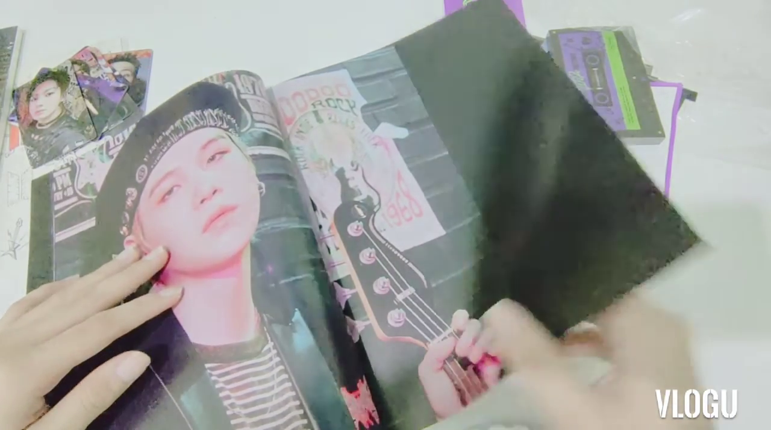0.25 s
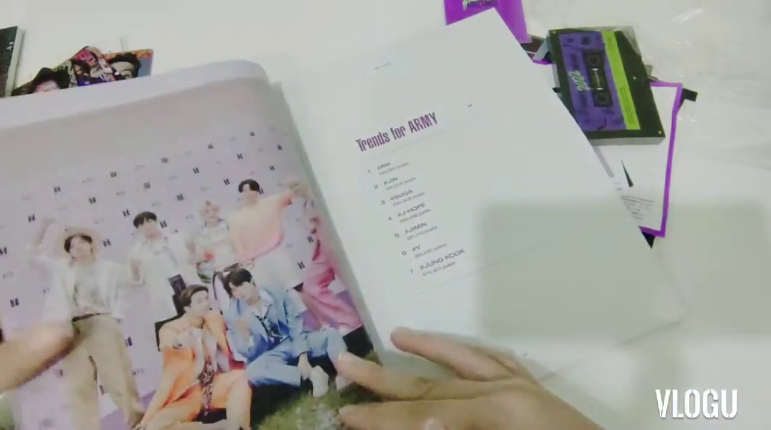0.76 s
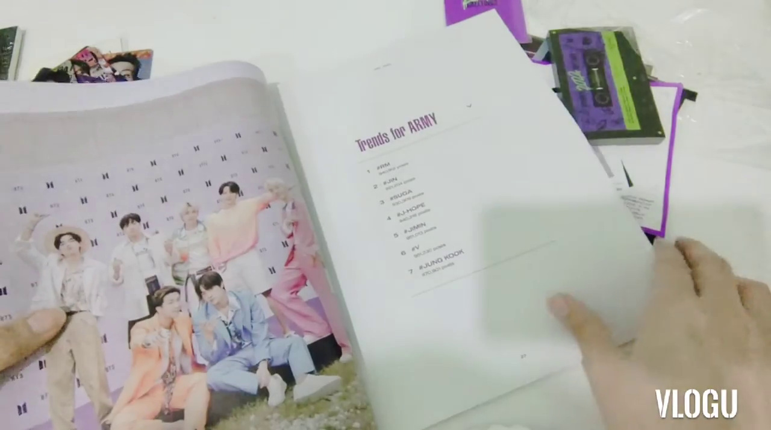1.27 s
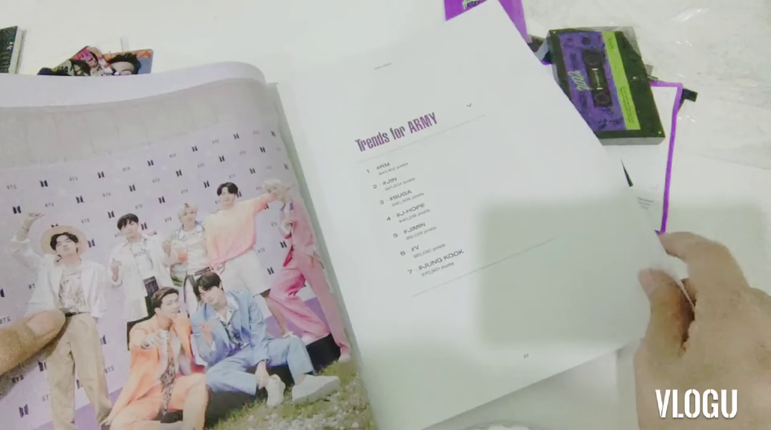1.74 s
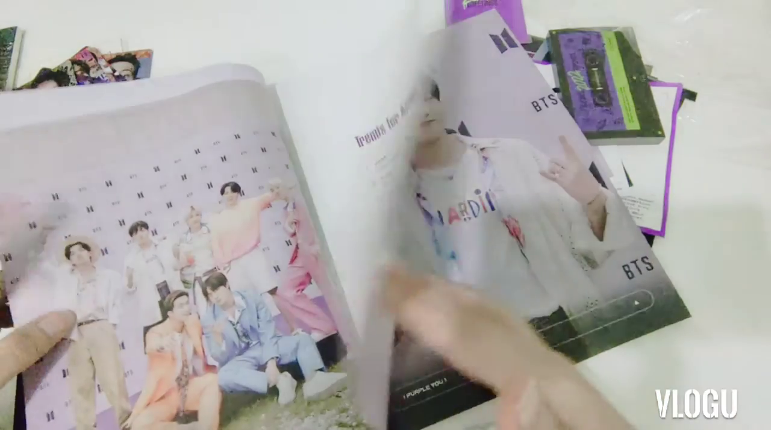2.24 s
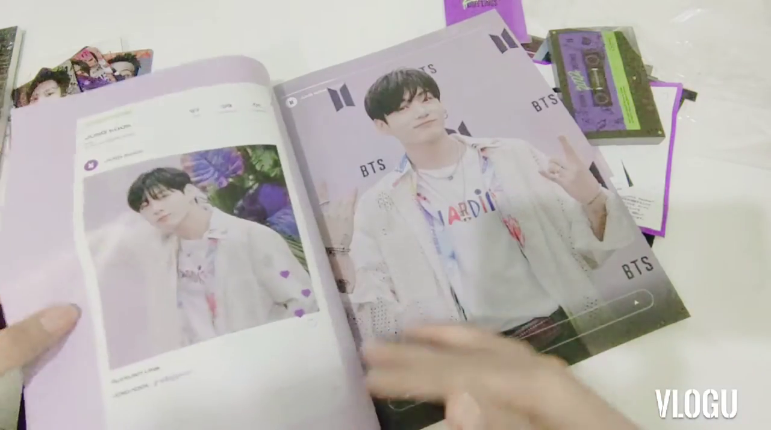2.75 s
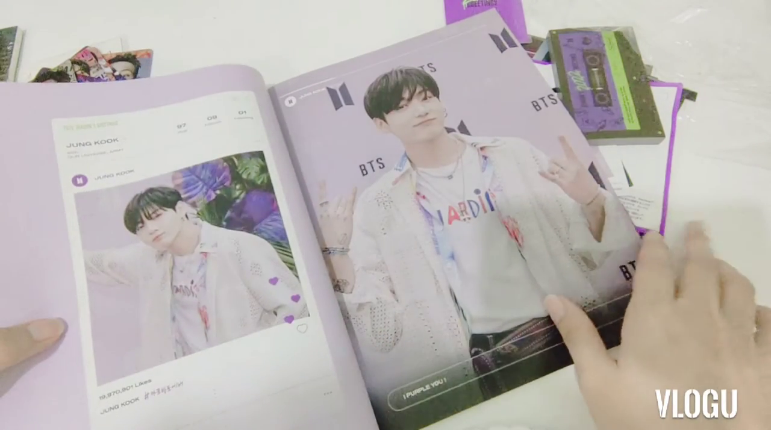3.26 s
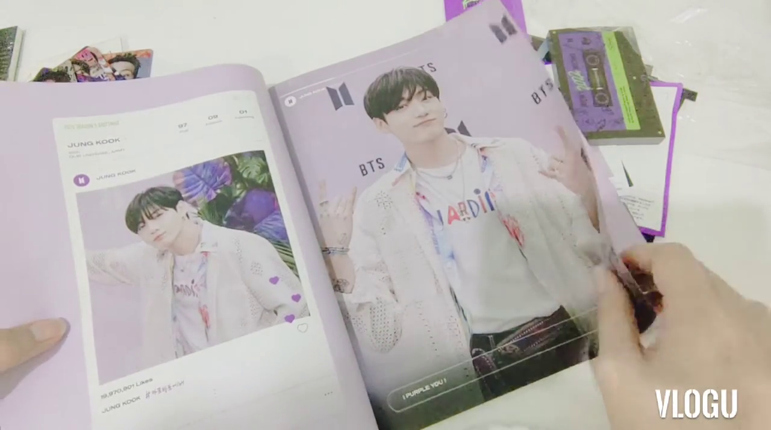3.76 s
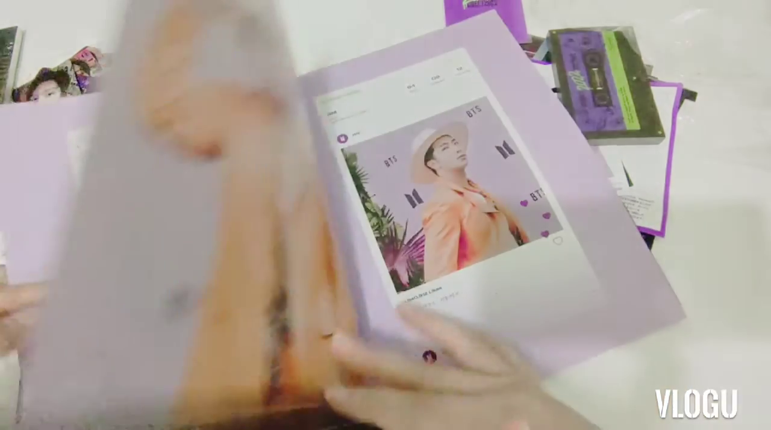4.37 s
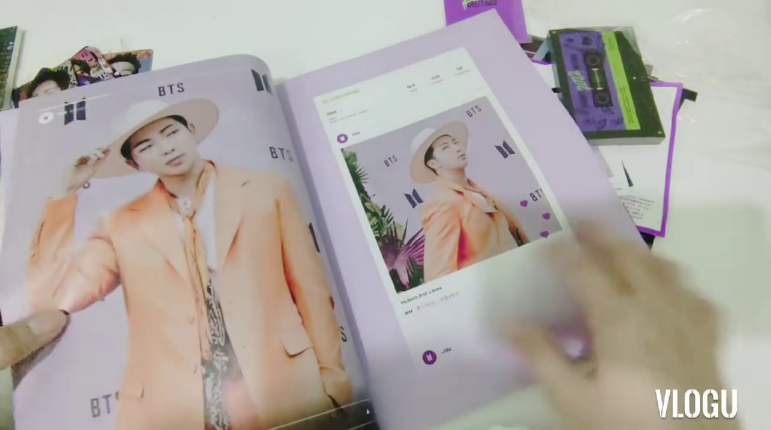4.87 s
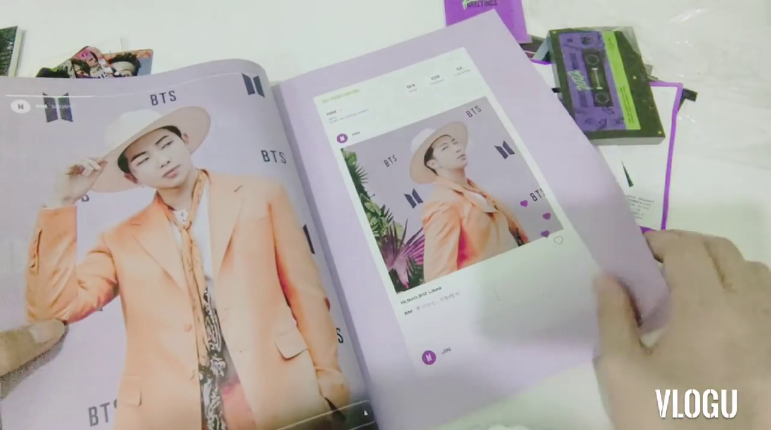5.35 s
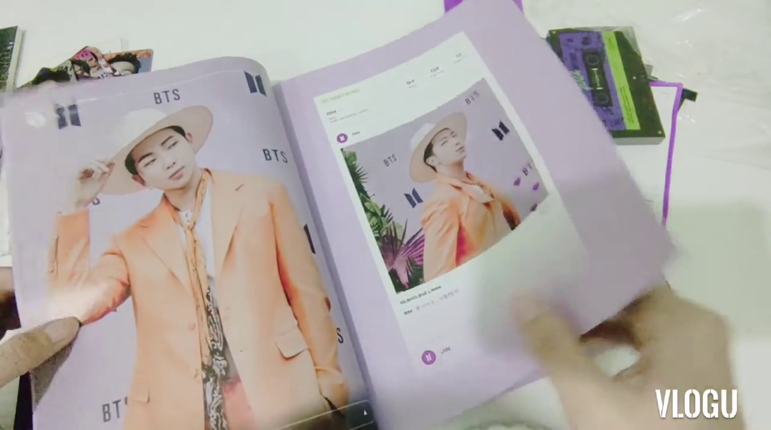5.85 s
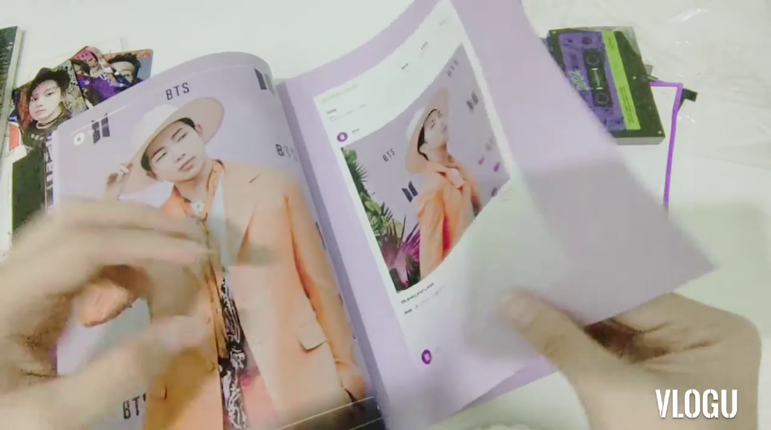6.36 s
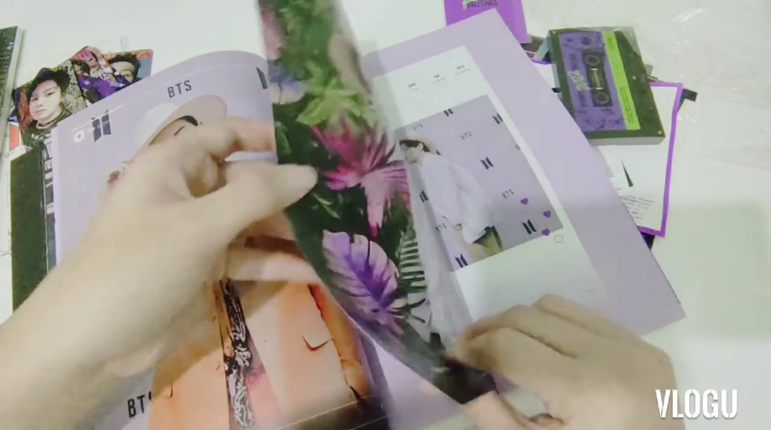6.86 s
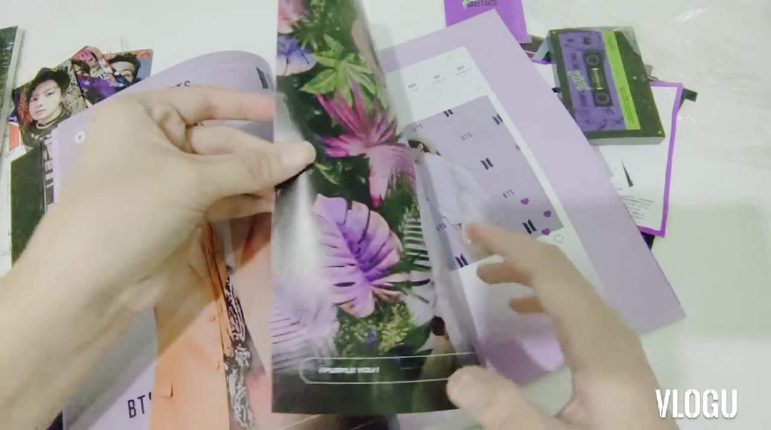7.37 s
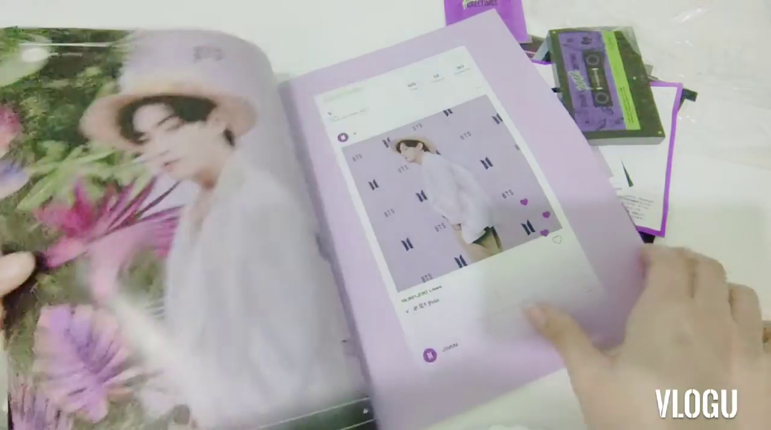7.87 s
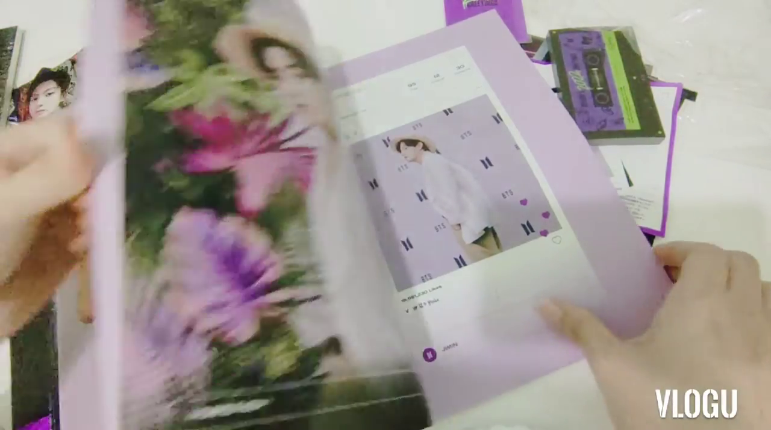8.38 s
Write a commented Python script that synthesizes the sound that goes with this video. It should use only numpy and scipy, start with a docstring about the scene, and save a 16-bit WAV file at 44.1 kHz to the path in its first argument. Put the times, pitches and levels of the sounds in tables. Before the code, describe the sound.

Glossy sheets slide with a fine hiss and light crinkle, punctuated by dry paper ticks and pops, each turn separated by a quiet lull. Around seven seconds the sounds grow louder: a hard crack, a run of jerky woody-papery creaks from a curled leaf, dull thumps and quick scrapes. Recorded close, with little reverberation and faint low room air.

```python
"""A fine hiss and crinkle, sharp snaps, soft bumps and late creaks: a thick, glossy photo book is turned by hand
on a table, close to one microphone in a small quiet room. Sliding sheets and fingertips make friction noise,
scraping edges drive the resonance of a gap, buckling paper rings briefly, hands bump the book, and a stiff leaf
bent back at its fold slips in jerks that set it swinging. Reflections, a short tail and still air surround it."""
import sys
import numpy as np
from scipy import signal
from scipy.fft import rfft, irfft, next_fast_len
from scipy.io import wavfile
from scipy.ndimage import uniform_filter1d

SR = 44100
rng = np.random.default_rng(int(sys.argv[2]) if len(sys.argv) > 2 else 0)


def dump_mix(stems):
    """Bounce the given channels to the path in sys.argv[1] as a 16-bit WAV at rate SR."""
    frames = np.atleast_2d(stems).T  # one column per channel
    limited = np.clip(frames, -1, 1)  # hard clip at full scale
    pcm = np.round(limited * 32767).astype(np.int16)
    wavfile.write(sys.argv[1], SR, pcm)


N = 380141
TIME = np.arange(N) / SR  # s


def undb(db):
    """Amplitude ratio of a level: 20 dB for each factor of ten."""
    return 10 ** (np.asarray(db) / 20)


def unit(x):
    """Normalise the mean power: scale to rms 1."""
    return x / np.sqrt(np.mean(x ** 2))


def crest(x, size=44):
    """Normalise a transient by short-time power: the loudest millisecond has the rms of a sine of amplitude 1."""
    loudest_power = uniform_filter1d(x ** 2, size, mode="constant").max()
    return x / np.sqrt(2 * loudest_power)


def colour(x, points):
    """Spectral shaping: weight x by (frequency_hz, level_db) points joined over log frequency; rms 1."""
    hz, db = np.transpose(points)
    size = next_fast_len(len(x))
    freqs = np.maximum(np.fft.rfftfreq(size, 1 / SR), 1)
    gain = undb(np.interp(np.log(freqs), np.log(hz), db))
    return unit(irfft(rfft(x, size) * gain, size)[:len(x)])


def resonate(x, hz, width):
    """Single damped resonance: a two-pole band-pass with gain 1 at hz and a bandwidth of width Hz."""
    w = 2 * np.pi * min(hz, .45 * SR) / SR
    a = np.sin(w) * width / hz / 2
    return signal.lfilter([a, 0, -a], [1 + a, -2 * np.cos(w), 1 - a], x)


def edge(x, hz, kind):
    """Band limiting: a steep fourth-order low-pass or high-pass."""
    sections = signal.butter(4, min(hz, .45 * SR), kind, fs=SR, output="sos")
    return signal.sosfilt(sections, x)


def walk(rate):
    """Slow random modulation: straight lines between normal draws, rate draws per second."""
    knots = rng.standard_normal(2048)
    return np.interp(TIME * rate, np.arange(len(knots)), knots)


def add(out, s, x):
    """Superposition: mix x into out from time s."""
    i = max(int(s * SR), 0)
    out[i:i + len(x)] += x[:max(N - i, 0)]


def friction(rate, spread_db, share):
    """Dry friction: smooth noise plus rate tiny catches per second, which hold the given share of the power."""
    smooth, sign = rng.standard_normal(N), rng.standard_normal(N)
    chance, size = rng.random(N), rng.exponential(size=N)
    catch_gain = undb(spread_db * np.minimum(size, 4))  # very uneven sizes
    catches = (chance < rate / SR) * np.sign(sign) * catch_gain
    share = np.clip(share, 0, 1)
    return np.sqrt(1 - share) * smooth + np.sqrt(share) * unit(catches)


def crinkle(rate=45, spread_db=4, hz=1200, hz_spread=0.42, cycles=1.7, size=600):
    """Snap-through of tiny dents: short damped sines, each with its own pitch and size; rms 1."""
    out, t = np.zeros(N), np.arange(size) / SR
    for when, pick, pitch, strength in rng.random((1200, 4)):
        if pick < rate * TIME[-1] / 1200:  # keeps about rate dents per second
            # sqrt(12) gives the uniform draw a spread of 1
            dent_hz = hz * np.exp(hz_spread * np.sqrt(12) * (pitch - .5))
            turns = t * dent_hz
            pop = np.sin(2 * np.pi * turns) * turns * np.exp(-2 * turns / cycles)
            add(out, when * TIME[-1], undb(-spread_db * np.log(strength + 0.037)) * pop)
    return unit(out)


def still_air():
    """Background noise: random pressure with most of its power in the bass, its level wandering slowly."""
    # spectrum of the still room: frequency_hz, level_db (per Hz, relative)
    air_spectrum = [(20, -36.5), (40, -9.5), (72, -0.5), (100, -3), (170, -13), (350, -16), (600, -40.5),
                    (1000, -35.5), (7000, -36.5), (9000, -49), (13000, -31), (16000, -34)]
    level_db = -75.5 + walk(6.2)
    return undb(level_db) * colour(rng.standard_normal(N), air_spectrum)


def curl_at(s):
    """Geometry of a bent sheet: how far the stiff leaf curls into a hollow at time s, 0-1."""
    # the leaf is raised and curls: time_s, curl (0-1)
    curl_points = [(6.9, 0.15), (7.03, 0.82), (8.0, 1), (8.1, 0.19), (8.6, 0.32)]
    return np.clip(np.interp(s, *np.transpose(curl_points)), 0, 1)


def stroke(s, rise, fall, db, size=44100):
    """Envelope of a contact force: power of one hand movement, from contact and swell to release and settling."""
    ease_db, attack_s, release_s = 10, .012, 0.028
    settle_db, settle_s = -9.5, 0.079  # the sheet goes on settling faintly after the release
    out, start = np.zeros(N), max(s - rise - .1, 0)
    t = start + np.arange(size) / SR
    before, after = np.maximum(s - t, 0), np.maximum(t - s, 0)
    ease = np.minimum(before / rise + after / fall, 1)
    early, late = np.maximum(before - rise, 0), np.maximum(after - fall, 0)
    contact = np.exp(-early / attack_s)
    release = np.maximum(np.exp(-late / release_s), undb(settle_db) * np.exp(-late / settle_s))
    add(out, start, (undb(db - ease_db * ease) * contact * release) ** 2)
    return out


def handling():
    """Addition of incoherent powers: gains of swish, body and sheen; slides mostly hiss, rubs mostly shake the sheet."""
    # a sheet slides over its neighbour, levels ahead of the mix in slides():
    # peak_s, rise_s, fall_s, swish_db, sheen_db and body_db (both relative to the swish)
    slide_strokes = [(.005, 0.0072, 0.11, -44, -8, -15), (0.191, 0.021, 0.087, -54.5, -10, -8.5),
                     (0.417, 0.049, 0.028, -57.5, -3.5, -2), (.475, .01, 0.25, -60, -10.5, -5),
                     (.6, 0.03, 0.089, -59, -6, -10), (.77, 0.15, 0.1, -56, -8.5, 0),
                     (1.045, 0.027, 0.23, -52, -7.5, -10.5), (1.57, 0.063, 0.074, -69.5, -8, -32),
                     (1.665, 0.059, .06, -62, -12, -12), (1.745, 0.01, 0.013, -51.5, -6.5, -11),
                     (1.875, 0.057, 0.19, -49.5, -10.5, -15.5), (2.15, 0.13, 0.17, -59, -8.5, -9),
                     (2.283, 0.062, 0.31, -51.5, -7.5, -5.5), (2.652, 0.057, 0.053, -54.5, -12.5, -13.5),
                     (2.954, 0.033, 0.054, -56.5, -4, -29), (3.13, 0.11, 0.16, -59, -3.5, -16),
                     (3.289, 0.014, 0.008, -57, -6.5, -6), (3.38, .04, 0.11, -80, 1, -20),
                     (3.87, 0.077, 0.016, -70, -11, 1.5), (3.925, 0.058, 0.073, -59, -5.5, -11.5),
                     (4.135, 0.16, .07, -56.5, -8, -8.5), (4.215, 0.023, 0.079, -55.5, -11, -12),
                     (4.37, .06, 0.034, -54.5, -11, -12), (4.665, 0.34, 0.1, -65.5, -10.5, -14),
                     (4.902, 0.075, 0.061, -54.5, -20, -4.5), (5.046, 0.12, 0.12, -58, -3.5, -6),
                     (5.48, 0.13, 0.027, -73, -3, -18), (5.545, 0.038, 0.052, -60.5, -4, -3.5),
                     (5.64, 0.15, 0.12, -65.5, -6.5, -7), (5.75, 0.025, 0.054, -63, -2.5, 6),
                     (5.914, 0.056, 0.12, -49.5, -11, -5.5), (6.415, 0.34, 0.12, -55.5, -10, -8.5),
                     (6.6, 0.23, 0.16, -64.5, -15, -1), (6.813, 0.0055, 0.017, -55.5, -11, 7),
                     (7.1, 0.043, 0.15, -60.5, -12, -14), (7.208, 0.023, 0.017, -50, -16, 3),
                     (7.67, 0.0027, .008, -44.5, -12, 0), (8.095, 0.015, .11, -53, -19, -4),
                     (8.254, 0.0077, .06, -40.5, -12.5, -3), (8.448, 0.094, 0.028, -47, -16.5, 1.5)]
    # fingertips rub the page or flex it: peak_s, rise_s, fall_s, body_db (ahead of the same mix)
    rub_strokes = [(.91, 0.025, 0.099, -55), (1.043, 0.028, 0.02, -44), (1.331, 0.043, 0.013, -45),
                   (1.823, 0.022, 0.027, -53.5), (2.849, 0.16, 0.3, -58), (3.11, .003, 0.012, -42.5),
                   (3.145, 0.0106, 0.042, -52), (4.783, 0.037, 0.025, -54.5), (5.23, 0.009, 0.032, -48.5),
                   (5.685, 0.022, 0.072, -54), (6.598, 0.063, 0.009, -53.5), (6.709, 0.026, 0.0073, -43.5),
                   (7.091, .012, 0.011, -48.5), (7.338, 0.096, 0.097, -40), (7.453, 0.043, 0.013, -37),
                   (7.566, 0.01, .035, -44), (7.672, 0.007, 0.0033, -36.5), (7.894, 0.021, 0.011, -43.5),
                   (7.974, .025, .03, -48), (8.13, 0.09, 0.094, -40), (8.54, 0.036, 0.028, -49.5)]
    rub_swish_db, rub_sheen_db = -12.5, -32  # relative to a rub's body
    rest_db = [-85, -90, -104]  # hands resting on the pages: swish, body, sheen
    swish, body, sheen = (undb(rest_db)[:, None] * undb(1.9 * walk(7))) ** 2
    for s, rise, fall, db, sheen_db, body_db in slide_strokes:
        power = stroke(s, rise, fall, db)
        swish = swish + power
        body = body + power * undb(body_db) ** 2
        sheen = sheen + power * undb(sheen_db) ** 2
    rubs = sum(stroke(*rub) for rub in rub_strokes)
    swish = swish + rubs * undb(rub_swish_db) ** 2
    sheen = sheen + rubs * undb(rub_sheen_db) ** 2
    return np.sqrt([swish, body + rubs, sheen])


def slides(dents=0.44, swish_db=-3.0, body_db=0.5, sheen_db=3):
    """Friction-driven radiation: the same catches drive swish and sheet body; the gloss adds a finer sheen."""
    # spectra of the swish, the flat sheet's body, the gloss and the rustle heard through the curled leaf's
    # hollow, each: frequency_hz, level_db (per Hz, relative)
    swish_spectrum = [(80, -57), (500, -20.5), (1300, -1.5), (2200, -3.5), (3200, 3), (4200, 2),
                      (5500, 2.5), (7800, -3), (8800, -25), (12000, -35), (16000, -44.5)]
    body_spectrum = [(80, -12), (170, -21), (280, 0.5), (450, 1.5), (650, 8), (1100, 1), (1600, -14.5),
                     (2400, -14), (4500, -51)]
    sheen_spectrum = [(5000, -12), (7500, 9), (9000, 2), (10500, 3), (12300, -1), (13200, 4), (15800, 0)]
    hollow_spectrum = [(100, -20), (200, -17), (430, -3.5), (560, -7.5), (670, -11.5), (740, -9.5),
                       (950, 5), (1080, -4.5), (1250, -13), (1900, -21), (2400, -19.5), (4000, -45)]
    swish_gain, body_gain, sheen_gain = handling()
    curl = curl_at(TIME)
    rub = friction(rate=1800, spread_db=4.0, share=0.47)
    pressure_db = 2.68 * walk(60)

    # the thin sheet's smallest dents tick within the swish
    ticks = 0.29 * crinkle(rate=110, spread_db=4.5, hz=3320)
    swish = (colour(rub, swish_spectrum) + ticks) * swish_gain * undb(swish_db)

    # soft fingertips judder, so the body flutters more than the hiss
    fingertips = friction(rate=260, spread_db=10.0, share=0.98)
    judder = (rub + .5 * fingertips) * undb(2 * walk(90))
    flat = 0.98 * colour(judder, body_spectrum) + dents * crinkle()
    # the hollow widens and narrows as the leaf flexes: a drifting time shift makes its pitch wander
    hollow = np.interp(TIME + 0.00147 * walk(30), TIME, colour(judder, hollow_spectrum))
    body = ((1 - curl) * flat + curl * hollow) * body_gain * undb(body_db)

    fine_rub = friction(rate=1200, spread_db=8.0, share=0.13)
    sheen = colour(fine_rub, sheen_spectrum) * sheen_gain * undb(sheen_db)
    return (swish + body + sheen) * undb(pressure_db)


def scrapes(size=30000):
    """Cavity resonance: an edge dragged over a sheet swells grainily through the gap between them."""
    # a sheet's edge scrapes over the next: peak_s, rise_s, fall_s, level_db, resonance_hz
    edge_scrapes = [(0.024, 0.021, .095, -43.5, 2440), (.765, 0.11, 0.1, -57.5, 5360),
                    (1.047, 0.0086, .017, -46.5, 2310), (1.205, .032, .013, -61, 3540),
                    (1.75, 0.015, 0.0053, -52, 5625), (1.885, .025, .15, -51, 2770),
                    (2.225, 0.017, 0.011, -52.5, 3040), (2.65, 0.038, 0.022, -57.5, 5000),
                    (2.93, 0.022, 0.098, -57, 4740), (3.137, .003, .022, -56.5, 2800),
                    (3.18, .012, 0.029, -55, 3570), (4.07, 0.16, 0.15, -66.5, 1165),
                    (4.137, .016, 0.025, -57, 1640), (4.87, 0.092, 0.082, -64.5, 5050),
                    (5.241, 0.012, 0.0095, -52, 3100), (5.53, 0.027, .011, -57.5, 3240),
                    (5.735, 0.05, 0.064, -62.5, 2000), (5.947, 0.012, 0.0069, -52, 5300),
                    (6.31, 0.085, .12, -63, 1140), (8.15, 0.059, 0.045, -45.5, 1400),
                    (8.268, 0.0095, .02, -40.5, 3330), (8.304, .003, 0.0073, -40, 3060)]
    gap_width = 0.53  # bandwidth as a share of the resonance frequency
    out = np.zeros(N)
    rub = friction(rate=2000, spread_db=6.0, share=0.4) * undb(2 * walk(140))
    for s, rise, fall, db, hz in edge_scrapes:
        start = max(s - 3 * rise, 0)
        t, grain = (x[int(start * SR):][:size] for x in (TIME, rub))
        swell = np.exp(-((t - s) / np.where(t < s, rise, fall)) ** 2)
        gap = resonate(resonate(grain, hz, gap_width * hz), hz, gap_width * hz)
        add(out, start, undb(db) * swell * unit(gap))
    return out


def glances(x, strength=0.21):
    """Comb filtering: early reflections from table and raised sheets, on drifting paths, shift the colour."""
    out = x.copy()
    for lag_s in (.0007, .0019, .0043):  # typical delays
        path_s = lag_s * np.exp(0.1547 * walk(2.5))
        out += strength * np.interp(TIME - path_s, TIME, x)
    return out / np.sqrt(1 + 3 * strength ** 2)  # keeps the power of incoherent paths


def room(x, wet_db=-19, low_t60=0.35, high_t60=0.41, size=30000):
    """Reverberation: bare walls return a faint, short tail of exponentially decaying noise (t60 in s)."""
    t = np.arange(size) / SR
    low = resonate(rng.standard_normal(size), 800, 1700) * undb(-60 * t / low_t60)
    high = resonate(rng.standard_normal(size), 3500, 3500) * undb(-60 * t / high_t60)
    tail = (low + undb(-1.5) * high) * (1 - np.exp(-t / 0.00073))
    return signal.fftconvolve(x, tail * undb(wet_db) / np.sqrt(np.sum(tail ** 2)))[:N]


def snaps(give_s=0.00089, contact_s=0.002, shiver_s=0.015, shiver_db=-19, kick=4.4, damping=0.29, size=4096):
    """Buckling instability: the paper starts to give, then snaps, rings for a few cycles and shivers briefly."""
    # paper snaps and finger taps on the page: snap_s, level_db (lowered by 3.5 dB below), ring_hz,
    # then crack_db, fizz_db and bass_db (relative to the ring)
    snap_events = [(0.1825, -39.5, 1780, 1, -26, -33), (0.1917, -37.5, 2240, 0, -29, -42),
                   (.3788, -54, 1470, 4, 6, -20), (0.467, -41.5, 1300, -1, -9, -2.5),
                   (.647, -41.5, 960, -19, -26, -10), (0.7661, -37, 900, -27, -25, -15),
                   (0.9993, -36, 1500, -8.5, -36, -33), (1.0281, -33.5, 1430, -32, -29, -23),
                   (1.0425, -33, 1680, 1, -1, 0), (1.0503, -31.5, 1140, -5, -11, -0.5),
                   (1.1091, -49, 845, 7, -17, 10), (1.289, -35.5, 660, -27, -32, -18),
                   (1.3401, -45.5, 700, 0, -3, 10), (1.7884, -45.5, 780, -1, -3.5, -1),
                   (1.8158, -41.5, 1110, 3, -27, -6), (1.8293, -39.5, 1380, -4, -28, -12),
                   (2.2706, -33, 940, -4, -15, -29), (2.289, -39, 2060, 8.5, -23, -32),
                   (2.315, -25.5, 2150, 3, -36, -6.5), (2.3956, -35, 1380, -22, -19, -33),
                   (2.4072, -31.5, 1970, -11, -31, -15.5), (2.813, -32.5, 940, -26, -39, -26),
                   (2.8214, -34.5, 1197, -38, -44, -34), (2.873, -38, 1360, -7, -39, -31),
                   (3.1041, -32, 880, -0.5, -35, -31), (3.134, -22, 2450, -11.5, -49.5, -25.5),
                   (3.9294, -33, 1200, -17, -12, -42), (4.893, -44, 1710, 4, -12, -1),
                   (4.9022, -46, 2870, -2, -1, -15), (5.212, -31.5, 960, -3.5, -47, -36),
                   (5.2214, -37, 1070, -15, -26, -32), (5.2404, -32, 1580, -13, -40, -25),
                   (5.5486, -32, 1360, -8, -11, -6.5), (5.7514, -45, 1250, -27, -22, 1.5),
                   (5.845, -47, 810, -9, -17, -2), (5.9038, -38, 1360, 0.5, -5, -20),
                   (5.9786, -48.5, 2050, 3, 8, -0.5), (6.517, -41, 1250, -5, -29, -2.5),
                   (6.5536, -34.5, 1090, -7.5, -19, -25), (6.573, -40.5, 1140, -2, -33, -2),
                   (6.5922, -27.5, 1080, -6, -20, -9), (6.6099, -41, 1160, -5, -16, -3),
                   (6.703, -23.5, 1090, -2.5, -17, -15), (6.8071, -34.5, 1050, -1.5, -12, -6),
                   (7.0302, -39, 915, -10, -12, -2.5), (7.2029, -16, 1160, 0, -29, -32),
                   (8.0464, -25, 990, -11, -15.5, -6), (8.42, -23.5, 1000, -2, -26, -10),
                   (8.4243, -23, 780, -8, -27, -29), (8.452, -32.5, 1900, -3, -7, -14),
                   (8.4693, -33, 970, -10, -25, -29), (8.5362, -39.5, 960, -7, -26, 2)]
    out, lead = np.zeros(N), 220  # samples ahead of the snap
    t = (np.arange(size) - lead) / SR
    give = np.exp(-np.abs(t) / give_s)
    shiver = undb(shiver_db) * np.exp(-np.abs(t) / shiver_s)
    force = np.where(t < 0, give, np.exp(-np.abs(t) / contact_s) + shiver)
    for s, db, hz, crack_db, fizz_db, bass_db in snap_events:
        push = rng.standard_normal(size) * force + kick * signal.unit_impulse(size, lead)
        ring = crest(edge(resonate(resonate(push, hz, damping * hz), hz, 3200), hz + 2000, "low"))
        crack = crest(edge(resonate(resonate(push, 2670, 1600), 2200, 3040), 10500, "low"))
        fizz = crest(edge(resonate(push, 4530, 4000), 3900, "high"))
        bass = crest(resonate(resonate(push, 510, 334), 280, 690))
        snap = ring + undb(crack_db) * crack + undb(fizz_db) * fizz + undb(bass_db) * bass
        add(out, s + t[0], undb(db - 3.5) * snap)
    return out


def bumps(thud_width=0.94, size=12000):
    """Impact on a heavily damped body: hands and falling pages push the book softly against the table."""
    # soft bumps of the book on the table: start_s, peak_db, pitch_hz, decay_s (of the push)
    book_bumps = [(1.046, -51, 84, 0.024), (1.108, -54, 133, 0.048), (1.29, -60, 195, 0.034),
                  (1.335, -51, 89, 0.054), (2.717, -62, 109, .03), (2.848, -60, 79.5, 0.079),
                  (5.157, -52.5, 85, 0.056), (5.187, -52, 86.4, 0.09), (6.462, -42, 137, 0.014),
                  (6.507, -49, 90.5, 0.047), (6.7, -46, 324, 0.03), (6.846, -46, 356, 0.026),
                  (7.664, -50.5, 80, 0.033), (8.046, -42.5, 75, 0.03), (8.152, -48, 85, 0.069),
                  (8.269, -50.5, 70, 0.053), (8.421, -54.5, 94, 0.12)]
    out, t = np.zeros(N), np.arange(size) / SR
    for s, db, hz, decay in book_bumps:
        push = rng.standard_normal(size) * np.exp(-t / decay)
        thud = resonate(resonate(push, hz, thud_width * hz), hz, 2 * thud_width * hz)
        add(out, s, undb(db) * thud / np.abs(thud).max())
    return out


def chatter(count=24):
    """Irregular stick-slip: small slips at uneven intervals, as rows of slip_s, level_db, click_db."""
    from_s, for_s, per_s = 7.305, .155, 60
    mean_db, spread_db, click_db = -32, 5, -9
    jitter = 0.17  # spread of the timing as a share of the interval
    slips = []
    for k, (late, strength) in enumerate(rng.standard_normal((count, 2))):
        if k / per_s < for_s:
            slips.append((from_s + (k + jitter * late) / per_s, mean_db + spread_db * strength, click_db))
    return slips


def creak(grit_s=0.0021, grit=1.0, creep=0.026, size=2048):
    """Stick-slip: each slip sets the stiff leaf swinging near one pitch; its gritty release rings the overtones."""
    # hard jerks of the creaking fold: slip_s, level_db (of the swing), click_db (bright, relative to the swing)
    hard_slips = [(7.245, -27.5, -11), (7.3309, -23.5, -19), (7.349, -29, -20), (7.3663, -30, -1),
                  (7.382, -27, -20), (7.4051, -27, -9), (7.413, -30, -22), (7.4358, -24, -15),
                  (7.441, -29.5, -10), (7.458, -19.5, -14), (7.5394, -34, -12), (7.5492, -27.5, -12),
                  (7.5579, -25, -9.5), (7.567, -26.5, -12), (7.581, -29.5, -8.5), (7.662, -20.5, -18),
                  (7.665, -13.5, -11.5), (7.675, -25.5, -17), (8.1065, -25, -5.5), (8.119, -33, -6),
                  (8.129, -26.5, -6), (8.1391, -24.5, -5), (8.159, -28, -7), (8.172, -34.5, 6)]
    # overtones of the bent leaf: frequency_hz (before the bend shifts it), width_hz, level_db (relative)
    leaf_overtones = [(1580, 240, 17), (2270, 320, 19), (2830, 340, 7), (4050, 500, 9.5), (4800, 360, 11.5),
                      (6450, 330, -21), (7900, 300, -28)]
    flat_hz, curled_hz = 1156, 894  # pitch of the leaf's swing at curl 0 and 1
    out, lead = np.zeros(N), 130  # samples ahead of the slip
    t = (np.arange(size) - lead) / SR
    for s, db, click_db in hard_slips + chatter():
        hz = flat_hz + (curled_hz - flat_hz) * curl_at(s)
        jerk = signal.unit_impulse(size, lead)
        # the fold creeps for a moment before it lets go
        grit_envelope = np.exp(-np.abs(t) / np.where(t < 0, .0008, grit_s))
        release = jerk + grit * rng.standard_normal(size) * grit_envelope
        swing = crest(resonate(resonate(jerk + creep * release, hz, 274), hz, 370))
        flex = crest(resonate(resonate(release, 453, 85), 374, 390))
        # the bend varies from slip to slip, and the overtones shift with it
        bend = np.exp(0.044 * rng.standard_normal())
        overtones = sum(undb(gain_db) * resonate(release, bend * f, width) for f, width, gain_db in leaf_overtones)
        click = crest(edge(overtones, 8000, "low"))
        add(out, s + t[0], undb(db) * (swing + undb(-20.0) * flex + undb(click_db) * click))
    return out


def linger(x, ring_db=-6, size=24000):
    """Modal decay: the curled leaf rings on, long and faint, after each slip."""
    # modes of the curled leaf: frequency_hz, level_db (relative), t60_s
    leaf_modes = [(470, -20, 0.2), (772, 9, 0.74), (890, -5, 1), (865, -11, 0.64), (1100, 3, 0.37),
                  (2283, -6, .5)]
    t = np.arange(size) / SR
    ring = sum(undb(db - 60 * t / t60) * np.sin(2 * np.pi * hz * t) for hz, db, t60 in leaf_modes)
    return undb(ring_db) * signal.fftconvolve(x, ring / np.abs(rfft(ring)).max() * 2)[:N]


def scene():
    """Superposition of sources: the book, its room and the still air."""
    air = still_air()
    paper = glances(slides() + scrapes() + snaps())
    fold = creak()
    book = paper + bumps() + fold + linger(fold)
    return (book + room(book) + air)[None]


def record(dry):
    """Band-limited transduction: the microphone thins the deepest bass; the recorder cuts the top."""
    thin = signal.sosfilt(signal.butter(2, 32, "high", fs=SR, output="sos"), dry)
    top_hz = 15900
    return signal.sosfilt(signal.ellip(10, .2, 70, top_hz, fs=SR, output="sos"), thin)


dry = scene()
out = record(dry)
dump_mix(out)
```